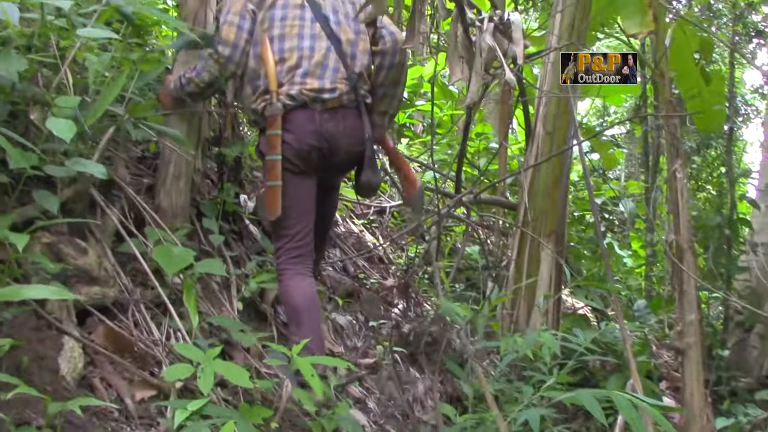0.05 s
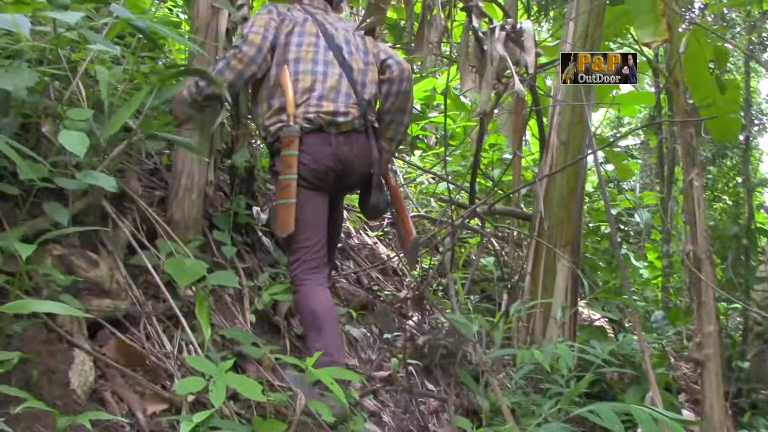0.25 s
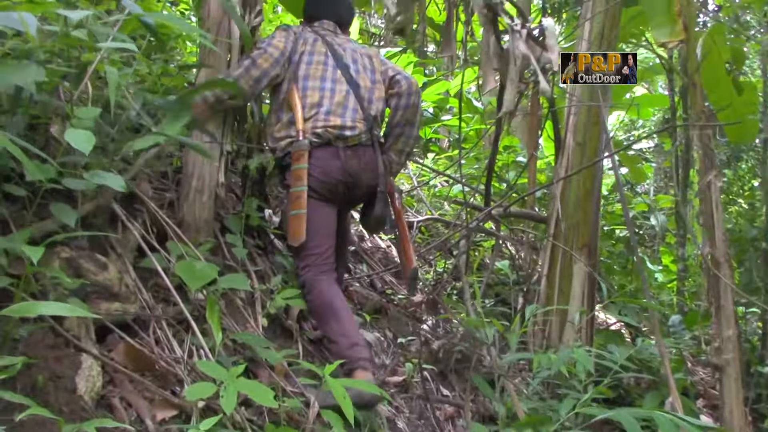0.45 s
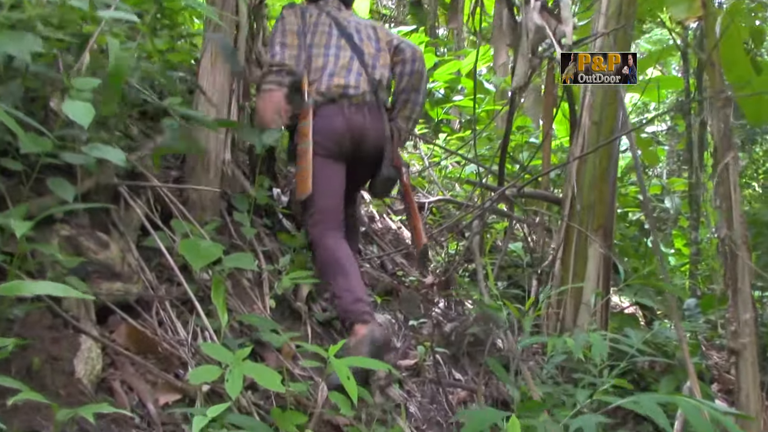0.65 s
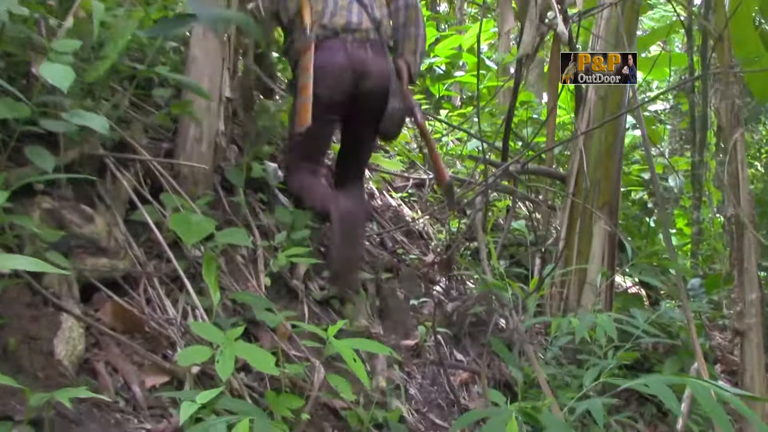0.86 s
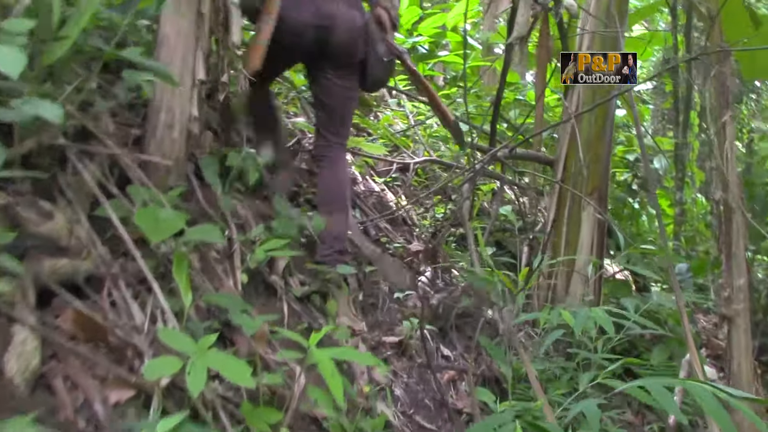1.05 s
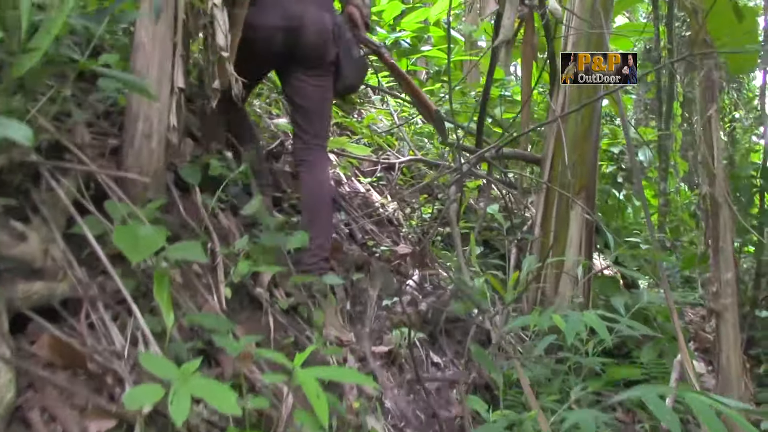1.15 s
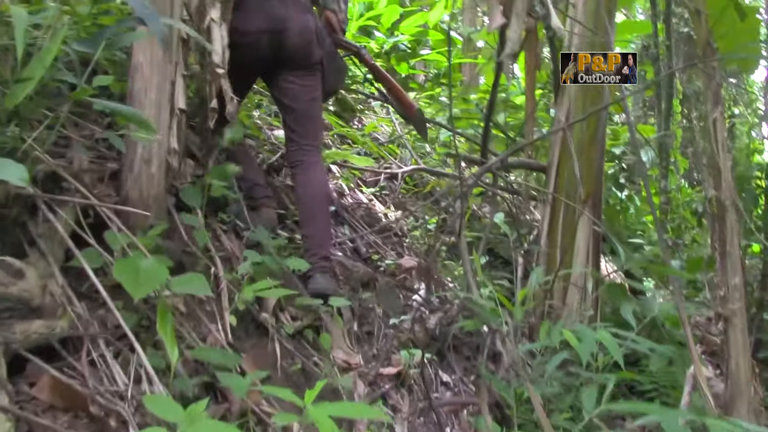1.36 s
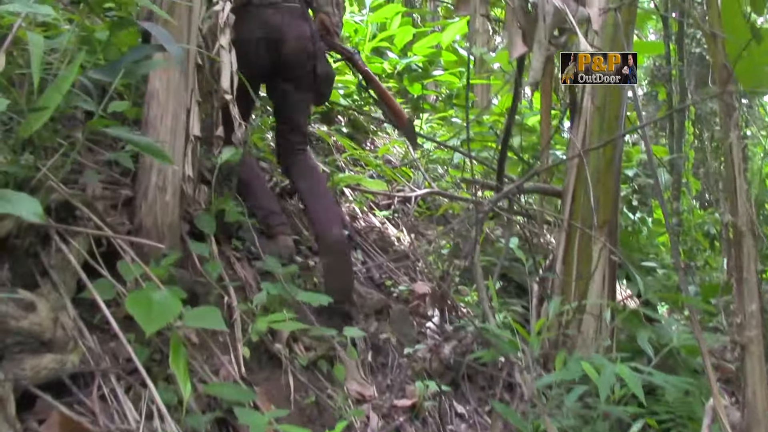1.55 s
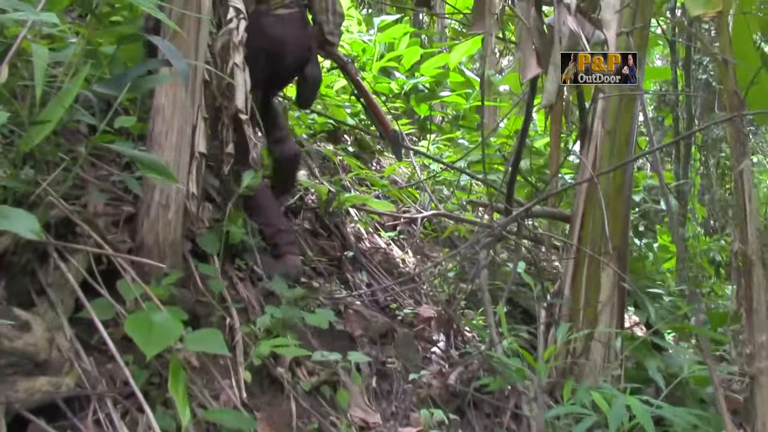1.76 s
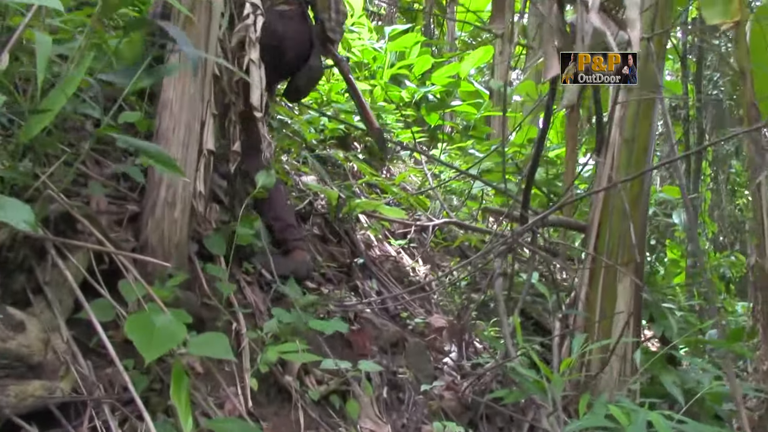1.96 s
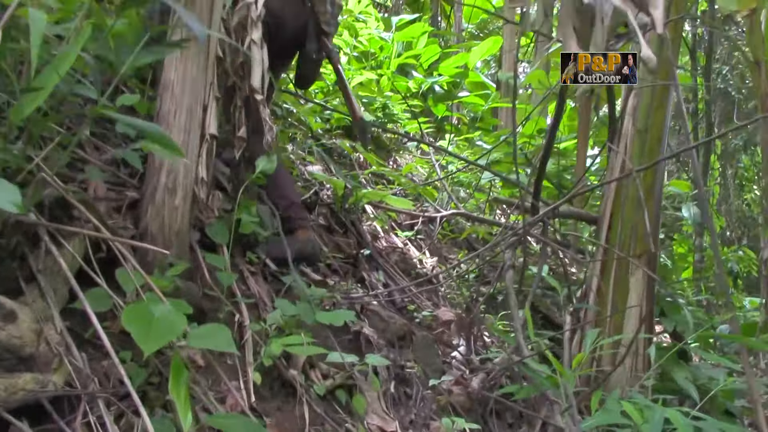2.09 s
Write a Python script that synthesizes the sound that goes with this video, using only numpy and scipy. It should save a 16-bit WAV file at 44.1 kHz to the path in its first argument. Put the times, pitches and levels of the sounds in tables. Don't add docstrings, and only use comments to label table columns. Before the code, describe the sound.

In a forest, thin high insect choruses pulse over a soft hush of air. Close by, a climber pushes through leaf litter: dense rustling, crunches and sharp dry twig snaps for two seconds, loudest around half a second. Then only small shifts, scattered crackles and a few dull knocks. A bird whistles falling notes, a second answering shorter, echoing softly among trunks. Close, nearly central stereo microphones.

```python
import sys
import numpy as np
from scipy import signal
from scipy.fft import rfft, irfft, next_fast_len
from scipy.io import wavfile
from scipy.ndimage import uniform_filter1d, map_coordinates

SR = 44100
rng = np.random.default_rng(int(sys.argv[2]) if len(sys.argv) > 2 else 0)


def persist_wave(psi):
    counts = np.round(np.clip(psi, -1, 1) * 32767).astype(np.int16)
    wavfile.write(sys.argv[1], SR, np.atleast_2d(counts).T)


def amplitude_ratio(level_db):
    exponent = np.asarray(level_db, float) / 20
    return 10 ** exponent


N = 264688

# start in [s], length in [s], level in [dB],
# colour in [octaves over 1 kHz].
CRUNCHES = [(0.323, 0.068, -38.5, -0.2), (0.586, .018, -33.5, -1.5), (0.635, 0.017, -32, -1.1),
            (0.783, 0.031, -36.5, 2.2), (0.84, 0.012, -37, 4.5), (.868, 0.013, -37, -1.2),
            (0.954, 0.041, -40.5, 1.5), (1.097, 0.021, -29.5, 2.2), (1.15, 0.013, -40.5, 1.5),
            (1.236, 0.022, -37.5, 0.7), (1.425, .01, -46, 3), (1.837, 0.033, -29.5, 0.85),
            (1.868, .012, -39, -0.5), (2.692, 0.02, -34, 5), (3.016, 0.05, -32, -0.27),
            (3.048, 0.046, -34.5, .9), (3.091, 0.039, -41, 0.8), (3.464, 0.024, -36, -0.8),
            (3.726, 0.041, -46.5, 0.5), (4.229, 0.054, -43.5, 0.2), (4.301, 0.04, -38, 0.56),
            (4.741, 0.02, -46.5, 1.5), (4.867, 0.0094, -42, 1.7), (4.948, 0.0086, -37, 1.5),
            (5.014, 0.016, -38.5, 2.6), (5.19, 0.032, -42, 2.9), (5.259, 0.028, -45.5, 2),
            (5.4, 0.03, -46, 1.3), (5.606, 0.019, -43, 2.5), (5.806, 0.04, -43.5, 1.3)]
# start in [s], peak in [dB], pitch in [Hz], dying noise in [dB re peak].
CLIMB_BREAKS = [(.127, -10, 4600, -7), (.250, -27, 4500, -14), (.282, -28, 5500, -8.5),
                (0.366, -21, 2600, -14.5), (.3855, -29, 5200, -9), (0.391, -11, 4200, -19),
                (.457, -27.5, 6200, -5), (0.5463, 1, 7340, -12), (.560, -20.5, 7600, -5),
                (0.582, -21, 1350, -9), (0.59, -27, 1400, -12), (0.638, -21, 1700, -2),
                (.660, -27, 2400, -11), (0.693, -12, 4160, -16), (0.7318, -16, 5270, -14),
                (.747, -17.5, 1900, -8), (0.8, -23, 2400, -13), (.812, -21, 4300, -18),
                (0.846, -29, 6700, -14), (.886, -31, 3300, -18), (0.962, -28, 5130, -13),
                (.993, -14.5, 7000, -16), (1.097, -15, 3220, -26), (1.176, -22, 6000, -12),
                (1.238, -21.5, 2420, -8), (1.346, -11.5, 4150, -14.5), (1.421, -22.5, 3500, -7),
                (1.438, -27, 6900, -9.5), (1.848, -6.5, 6050, -19.5), (1.875, -8, 6400, -9.5)]
# start in [s], peak in [dB], pitch in [Hz],
# dying noise in [dB re peak].
SHIFT_BREAKS = [(2.115, -31, 2300, -20), (2.156, -29, 2800, -14), (2.471, -25.5, 5000, -4.5),
                (2.7, -16.5, 7700, -9), (2.841, -24, 2110, -14), (3.002, -31, 890, 0.5),
                (3.140, -18, 4600, -12), (3.202, -24.5, 2000, -8), (3.375, -29.5, 2730, -9),
                (3.439, -27.5, 4800, -3.5), (3.4596, -12, 2540, -2), (3.497, -34, 2600, 3),
                (3.671, -30, 2160, -2), (3.721, -25.5, 4300, -11), (3.762, -26, 3800, -8.5),
                (3.914, -36, 2900, -20), (4.199, -34, 2700, 0), (4.232, -32.5, 1790, -6),
                (4.450, -21, 3740, -9.5), (4.476, -30, 4300, -10), (4.784, -27.5, 8040, -9),
                (4.830, -30.5, 1540, 3), (4.9503, -27, 3200, -14), (4.955, -21, 5830, -9),
                (5.024, -20, 2640, -7.5), (5.196, -19, 6840, -14), (5.416, -25.5, 4370, -15),
                (5.570, -28.5, 2660, 2.5), (5.785, -30.5, 3800, -7), (5.816, -23, 2900, -4.5)]
BAND_OCTAVES = np.array(np.array([-1.5, .4, 2.1, 3.3]))
# frequency in [Hz], left-right likeness [0-1].
ALIKE = [(30, 0.55), (70, 0.75), (150, 0.94), (400, 0.987), (1500, 0.997), (3000, .991), (6000, .975),
         (12000, 0.97)]


def unit(x):
    return x / np.sqrt(np.mean(x ** 2) + 1e-20)


def along(points, hz):
    f, v = np.transpose(points)
    return np.interp(np.log(hz + 1), np.log(f + 1), v)


def wobble(rate_hz):
    knots = rng.standard_normal(int(N * rate_hz / SR) + 4)
    return map_coordinates(knots, [np.arange(N) * rate_hz / SR])


def puffs(per_second, scatter_db, life_s):
    draw = rng.random((2, N))
    size = amplitude_ratio(scatter_db * -np.log(draw[1] + 1e-9).clip(-4)) * (draw[0] < per_second / SR)
    return unit(signal.lfilter([1], [1, -np.exp(-1 / (life_s * SR))], size))


def filtered(x, response):
    m = next_fast_len(N + SR // 4)
    return irfft(rfft(x, m) * response(np.fft.rfftfreq(m, 1 / SR)), m)[..., :N]


def spread(pair, alike):
    def mid_side_gains(hz):
        turn = np.arccos(np.clip(along(alike, hz), -1, 1)) / 2
        return np.array([np.cos(turn), np.sin(turn)])

    mid, side = filtered(pair, mid_side_gains)
    return np.array([mid + side, mid - side])


def forest():
    # frequency in [Hz], density in [dB per Hz].
    air = [(25, -20.5), (60, -4), (150, -3.5), (400, 0.5), (1000, -11.5), (3000, -10), (7000, -15),
           (11000, -18), (16000, -36)]
    # centre in [Hz], width in [Hz], level in [dB].
    insects = [
        (4620, 450, -55.5),
        (6760, 380, -61),
        (9340, 950, -56.5),
    ]
    hush = filtered(rng.standard_normal((2, N)), lambda hz: amplitude_ratio(along(air, hz)))
    out = amplitude_ratio(-50.5) * unit(spread(hush, ALIKE))
    for centre_hz, width_hz, db in insects:
        band = filtered(rng.standard_normal((2, N)), lambda hz: np.exp(-2 * ((hz - centre_hz) / width_hz) ** 2))
        pulse = amplitude_ratio(db + 0.82 * wobble(3.9) + 1.7 * wobble(50))
        out += pulse * unit(spread(band, [(100, .9)]))
    return out


def crackle(grain_db, patchy_db):
    sway_db, centred_db = 4.5, -1
    grains = 1 + amplitude_ratio(grain_db) * puffs(400, 2.3, 0.00092)
    z = signal.stft(rng.standard_normal((2, N)) * grains, nperseg=128)[2]

    def patches(bins, frames):
        rough = rng.standard_normal(z.shape[1:])
        return unit(uniform_filter1d(uniform_filter1d(rough, size=bins, axis=0), size=frames, axis=1))

    field = patches(5, 5)
    z[1] *= amplitude_ratio(sway_db * patches(9, 45) + centred_db)
    return signal.istft(z * amplitude_ratio(patchy_db * field), nperseg=128)[1][:, :N]


def four_bands(x):
    edges_hz = [700, 2500, 7000]

    def band_gains(hz):
        lows = [1 / (1 + (hz / edge) ** 6) for edge in edges_hz]
        low = np.array([0 * hz] + lows + [1 + 0 * hz])
        return np.sqrt(np.diff(low, axis=0).clip(0))[:, None]

    return [unit(part) for part in filtered(x[None], band_gains)]


def coloured(db, octave, fall_db):
    return db - fall_db * (BAND_OCTAVES[:, None] - octave) ** 2


def rustle_power(t):
    # time in [s], pressure in [dB], colour in [octaves over 100 Hz].
    rustle = [(0.0, -35, 3.48), (0.35, -36.5, 4.16), (0.72, -29.5, 4.04), (0.98, -30.5, 4.4),
              (1.2, -30, 4.57), (1.42, -35.5, 3.93), (1.84, -38.5, 3.83), (2.0, -40.5, 3.24),
              (2.22, -39.5, 4.52), (2.62, -37, 3.93), (2.94, -38, 2.9), (3.29, -42.5, 4.2),
              (3.72, -45.5, 3.1), (4.18, -44.5, 3.44), (4.63, -42.5, 3.45), (4.91, -39, 4.1),
              (5.61, -46, 4.9), (6.0, -43, 4.6)]
    shares_db = [-4, -8, -6.5, -10]
    s, pressure_db, colour = np.transpose(rustle)
    octave = np.interp(t, s, colour) - np.log2(10)
    levels = coloured(np.interp(t, s, pressure_db), octave, fall_db=1.27)
    power = np.array([amplitude_ratio(2.036 * (db + share + 0.97 * wobble(14) + 1.5 * wobble(3.52)))
                      for db, share in zip(levels, shares_db)])
    return power * amplitude_ratio(0.67 * wobble(30))


def drag_power(t):
    # middle in [s], half length in [s], level in [dB], colour in [octaves over 1 kHz].
    drags = [(0.01, .06, -47, -5.2), (0.52, 0.17, -41.5, 4.5), (0.642, .05, -40, -6),
             (1.13, 0.064, -39, -3), (1.32, .05, -42, 1), (1.345, 0.094, -49, -6), (1.66, 0.048, -39, -2),
             (1.97, 0.076, -43, 1.7), (2.605, .04, -46, -2.5), (2.763, 0.099, -41.5, 1.3),
             (3.01, 0.034, -47, 0.6), (3.55, .06, -38.5, -2.4), (3.94, 0.057, -49.5, 0),
             (4.243, 0.052, -48.5, 2.5), (4.49, 0.038, -48, 2), (4.72, 0.056, -46, 1.5),
             (5.192, 0.094, -49, 0), (5.61, 0.056, -43.5, 0)]
    power = np.zeros((4, N))
    for middle, half, db, octave in drags:
        near = slice(max(0, round((middle - 3 * half) * SR)), round((middle + 3 * half) * SR))
        swell = np.exp(-2 * ((t[near] - middle) / half) ** 2)
        power[:, near] += amplitude_ratio(2 * coloured(db, octave, fall_db=6)) * swell
    return power


def snap_tail_power():
    body_fall_db, tail_fall_db = 4.5, 14
    t60_s = 0.024 * np.array([[2.6], [1.5], [1.01], [.8]])
    tails, u = np.zeros((4, N + SR)), np.arange(SR // 4) / SR
    for start, peak_db, hz, tail_db in CLIMB_BREAKS + SHIFT_BREAKS:
        octave = np.log2(hz / 1000)
        fall_db = np.where(BAND_OCTAVES[:, None] < octave, body_fall_db, tail_fall_db)
        db = coloured(peak_db + tail_db, octave, fall_db)
        tails[:, round((start + .0006) * SR):][:, :len(u)] += amplitude_ratio(2 * (db - 60 * u / t60_s))
    return tails[:, :N]


def crunch_power():
    pressed, u = np.zeros((4, N + SR)), np.arange(SR // 4) / SR
    for start, length, db, octave in CRUNCHES:
        release = amplitude_ratio(-120 * (u - length).clip(0) / (0.045 + 2.2 * length))
        shape = (1 - np.exp(-u / (0.37 * length))) * release
        pressed[:, round(start * SR):][:, :len(u)] += amplitude_ratio(2 * coloured(db, octave, fall_db=1.37)) * shape
    smoothness = np.array([[6], [3], [2.2], [2.2]])
    steps = (smoothness + puffs(260, 1.5, .0015)) ** 2
    return pressed[:, :N] * steps / np.mean(steps, axis=1, keepdims=True)


def leaves():
    # frequency in [Hz], density in [dB per Hz].
    litter = [(40, -20), (100, -14.5), (200, -3.5), (300, 1), (600, -4.5), (1500, -7), (4000, -8),
              (8000, -5.5), (11000, -5.5), (16000, -12)]
    t = np.arange(N) / SR
    power = rustle_power(t) + drag_power(t) + crunch_power() + snap_tail_power()
    bed = crackle(grain_db=-11, patchy_db=2.5)
    bed = spread(filtered(bed, lambda hz: amplitude_ratio(along(litter, hz))), ALIKE)
    return sum(np.sqrt(p) * band for p, band in zip(power, four_bands(bed)))


def birds():
    # start in [s], length in [s], top pitch in [Hz].
    glides = [
        (.02, .38, 4130),
        (1.44, .42, 4230),
        (3.825, .37, 4200),
    ]
    glide_db = [-49, -50, -47]
    # start in [s], length in [s], level in [dB].
    drops = [
        (2.13, .3, -52),
        (5.73, .3, -55),
    ]
    # start in [s], length in [s], top pitch in [Hz], level in [dB].
    slides = [
        (3.15, .27, 3900, -51),
        (4.49, .27, 4050, -53),
    ]
    phrase = [(0, 1), (.13, .92), (.3, .893), (.6, .765), (.71, .735), (.8, .665), (1, .62)]
    held_drop = [(0, 1), (.1, .962), (.35, .946), (.43, .81), (.73, .69), (1, .65)]
    even_slide = [(0, 1), (.2, .91), (.42, .82), (.67, .73), (1, .65)]
    # time in [share of length], level in [dB].
    breath = [(0, -8), (.1, -3), (.22, 0), (.4, -1), (.72, -2.5), (1, -12)]
    drop_hz, edge_s = 4450, .01
    out, t = np.zeros(N), np.arange(N) / SR
    flutter, swell = wobble(80), wobble(30)
    calls = [(*row, db, phrase) for row, db in zip(glides, glide_db)]
    calls += [(s, length, drop_hz, db, held_drop) for s, length, db in drops]
    calls += [(*row, even_slide) for row in slides]
    for s, length, top_hz, db, tune in calls:
        u = (t - s) / length
        glide = uniform_filter1d(np.interp(u, *np.transpose(tune)), size=800)
        pitch_hz = top_hz * glide + 40 * flutter
        edges = (np.minimum(u, 1 - u) * length / edge_s).clip(0, 1)
        level = amplitude_ratio(db + np.interp(u, *np.transpose(breath))) * edges
        out += level * amplitude_ratio(1.4 * swell) * np.sin(2 * np.pi * np.cumsum(pitch_hz) / SR)
    return out


def trunks(x, rise_s):
    # frequency in [Hz], t60 in [s].
    decay = [(200, .25), (3000, .42), (10000, .2)]
    hz, t, z = signal.stft(rng.standard_normal((2, SR // 2)), SR, nperseg=256)
    build = 1 - np.exp(-(t + 0.00088) / rise_s)
    fade = amplitude_ratio(-60 * t / along(decay, hz)[:, None])
    tail = signal.istft(z * build * fade, SR, nperseg=256)[1]
    tail = tail[0] + 0.11 * np.array([[1], [-1]]) * tail[1]
    return signal.fftconvolve(x[None], tail / np.linalg.norm(tail[0]), axes=1)[:, :N]


def cracks():
    splinter_s, splinter_db = 0.0046, -10.5
    crush_gap_s, crush_db = .004, 7
    rows = []
    for (s, db, hz, _), draw in zip(CLIMB_BREAKS + SHIFT_BREAKS, rng.standard_normal((60, 3))):
        for k in range(3):
            time_s = s + k * splinter_s * (1 + .15 * draw[k])
            rows.append((time_s, hz * (1 + 0.02 * k * draw[k]), db + k * splinter_db))
    for (s, length, db, octave), draw in zip(CRUNCHES, rng.standard_normal((30, 3, 16))):
        after = np.cumsum(crush_gap_s * np.exp(.6 * draw[0]))
        pitch_hz = (1000 * 2 ** (0.45 * octave + 1.397 + 0.53 * draw[1])).clip(800, 9000)
        fading_db = -60 * (after - length).clip(0) / (0.041 + length)
        rows += list(zip(s + after, pitch_hz, db + crush_db + 2.5 * draw[2] + fading_db))
    return rows


def twigs():
    out, u, rows = np.zeros(N + SR), np.arange(SR // 8 // 8) / SR, cracks()
    for (start, hz, db), draw in zip(rows, rng.standard_normal((len(rows), 2))):
        attack = 1 - np.exp(-6 * u * hz)
        body = attack * amplitude_ratio(-60 * u * hz / 10) * np.sin(2 * np.pi * 1.07 * hz * u)
        edge = .25 * amplitude_ratio(-60 * u * hz / 5) * np.sin(2 * np.pi * hz * (1.7 + .15 * draw[1]) * u)
        out[round(start * SR):][:len(u)] += np.sign(draw[0]) * amplitude_ratio(db + 2.5) * (body + edge)
    return out[:N]


def thuds():
    # start in [s], pitch in [Hz], level in [dB], t60 in [s].
    modes = [(4.8325, 215, -26, .13), (4.8322, 310, -21, .035), (4.8315, 450, -28, .07),
             (4.845, 170, -33, .1), (4.8702, 1200, -38, 0.08), (4.3152, 106, -36, 0.084),
             (0.7002, 235, -36, .06), (3.4602, 570, -26, 0.06), (3.4603, 850, -24, .05),
             (3.461, 95, -33, .1), (3.4605, 320, -29, .05), (3.4604, 1500, -24, .03),
             (2.6992, 1570, -25, .04), (2.7002, 1340, -26, .04), (3.0042, 590, -20, 0.016),
             (3.0035, 300, -28, .05)]
    out, u = np.zeros(N + SR), np.arange(SR // 8) / SR
    for start, hz, db, t60 in modes:
        attack = 1 - np.exp(-3.5 * u * hz)
        out[round(start * SR):][:len(u)] += amplitude_ratio(db - 60 * u / t60) * attack * np.sin(2 * np.pi * hz * u)
    return out[:N]


def scene():
    wood, song = twigs() + thuds(), birds()
    close = wood * amplitude_ratio([[.2], [-.2]]) + amplitude_ratio(-8.0) * trunks(wood, rise_s=0.0021)
    far = amplitude_ratio(-9) * song + amplitude_ratio(2) * trunks(song, rise_s=.02)
    return forest() + leaves() + far + close


def band_limit(x):
    return signal.sosfilt(signal.butter(12, 16520, fs=SR, output="sos"), x)


def record(dry):
    top_hz = 15800
    bass_cut = signal.sosfilt(signal.butter(2, 130, "high", fs=SR, output="sos"), dry)
    port_noise = filtered(rng.standard_normal((2, N)), lambda hz: 12 / (1 + (hz / 70) ** 2))
    mix = filtered(bass_cut + amplitude_ratio(-79.0) * port_noise, lambda hz: hz < top_hz)
    return band_limit(mix)


dry = scene()
out = record(dry)
persist_wave(out)
```